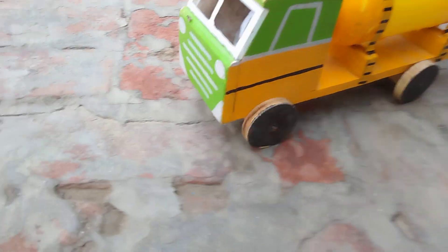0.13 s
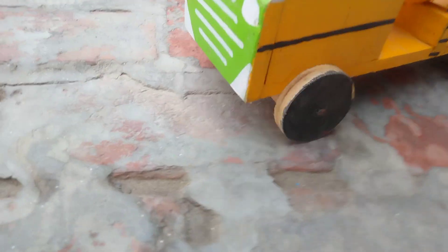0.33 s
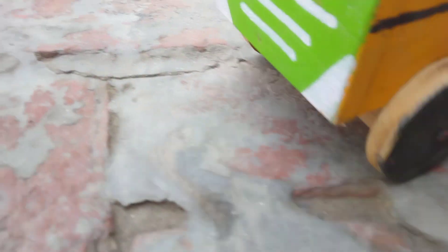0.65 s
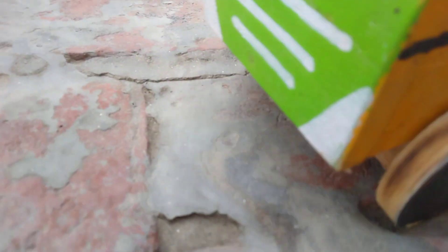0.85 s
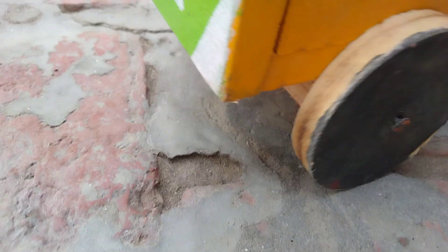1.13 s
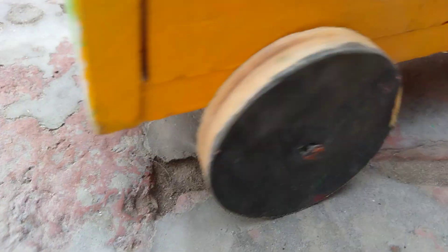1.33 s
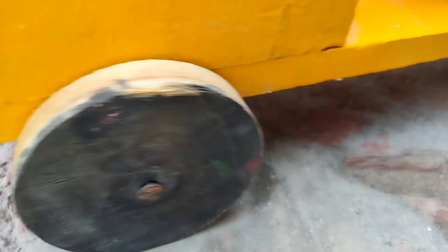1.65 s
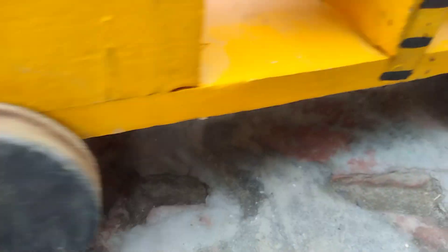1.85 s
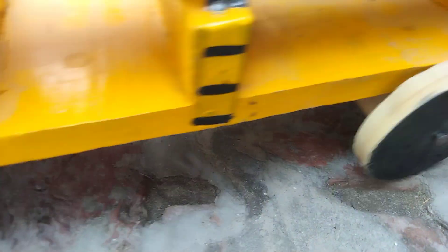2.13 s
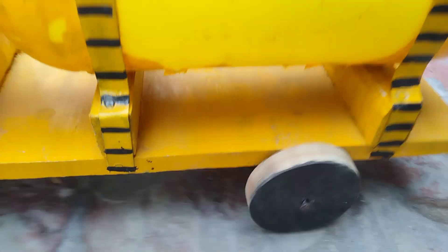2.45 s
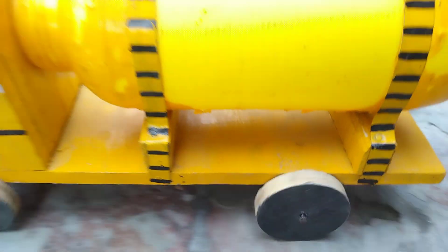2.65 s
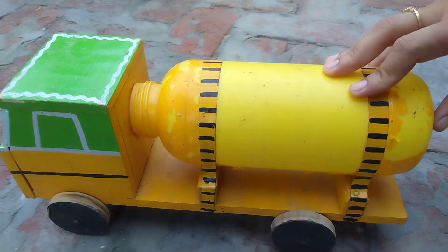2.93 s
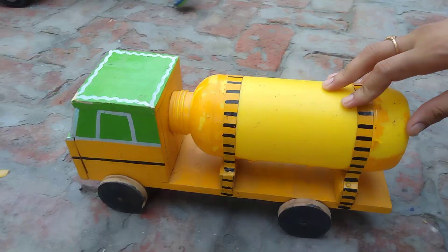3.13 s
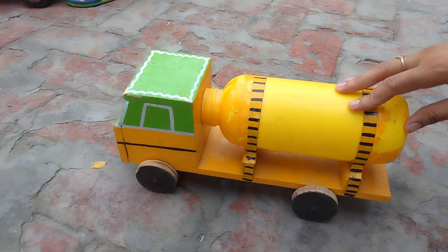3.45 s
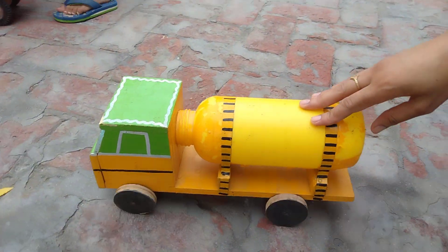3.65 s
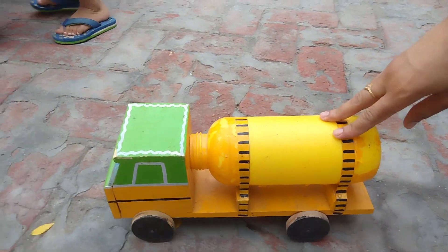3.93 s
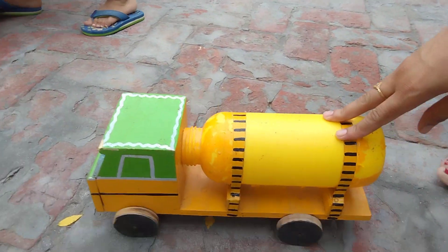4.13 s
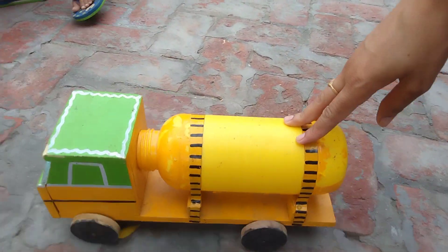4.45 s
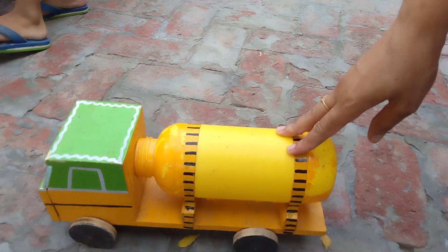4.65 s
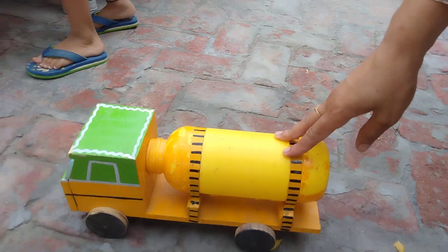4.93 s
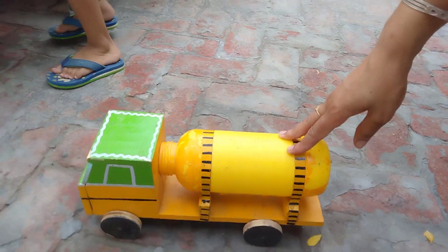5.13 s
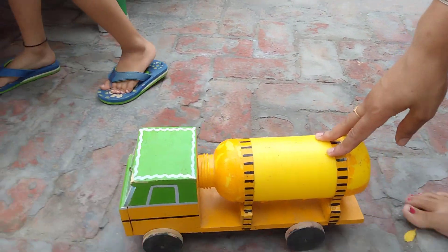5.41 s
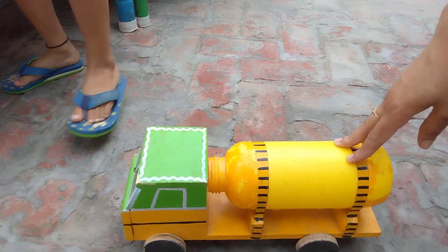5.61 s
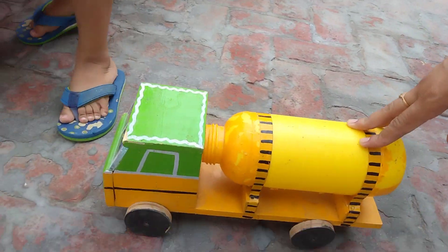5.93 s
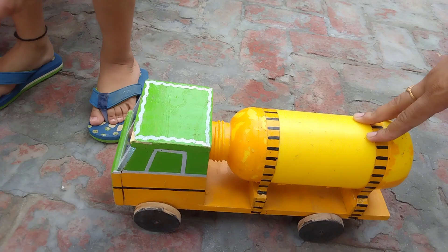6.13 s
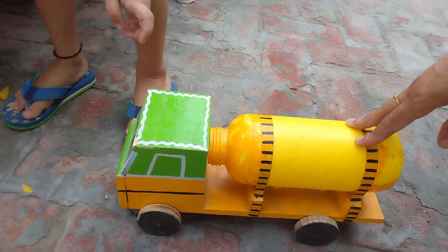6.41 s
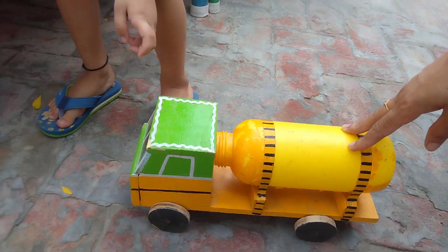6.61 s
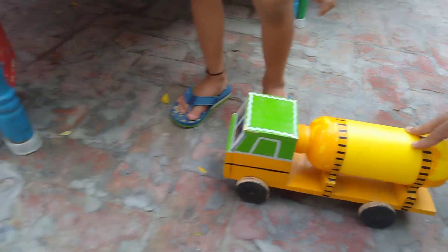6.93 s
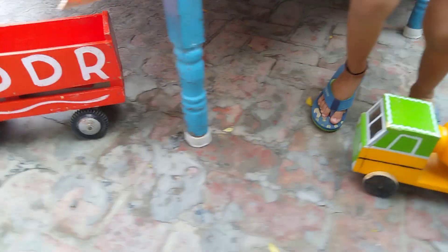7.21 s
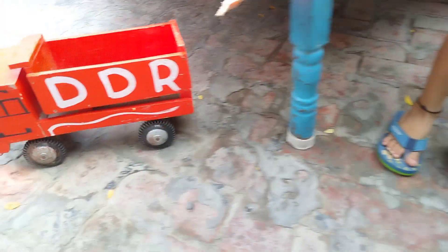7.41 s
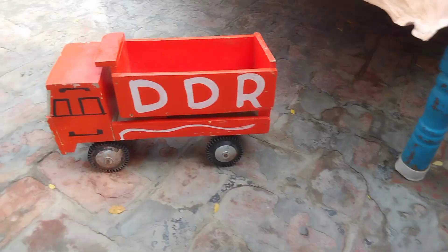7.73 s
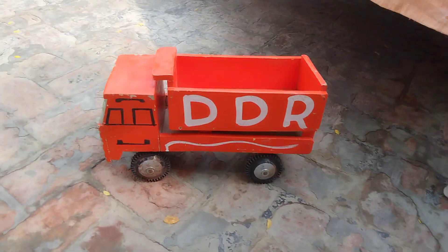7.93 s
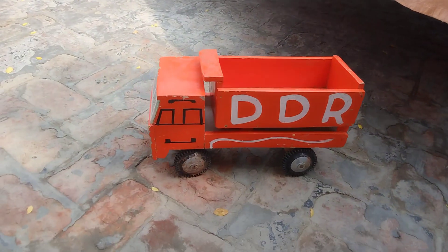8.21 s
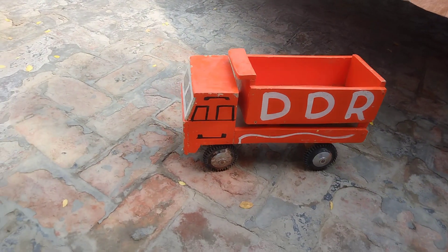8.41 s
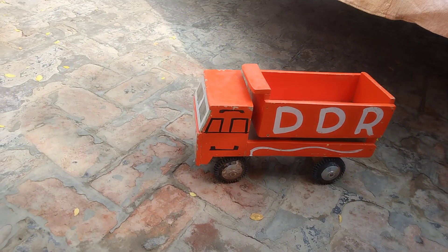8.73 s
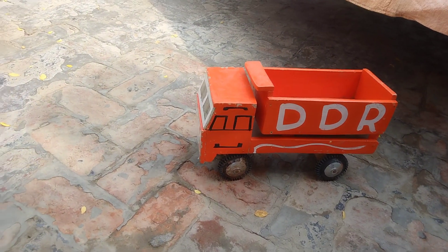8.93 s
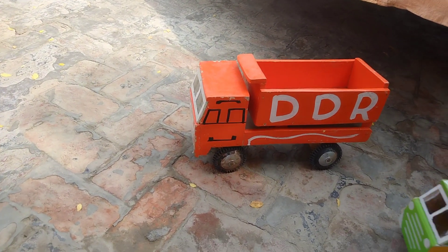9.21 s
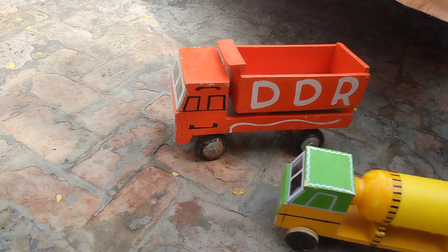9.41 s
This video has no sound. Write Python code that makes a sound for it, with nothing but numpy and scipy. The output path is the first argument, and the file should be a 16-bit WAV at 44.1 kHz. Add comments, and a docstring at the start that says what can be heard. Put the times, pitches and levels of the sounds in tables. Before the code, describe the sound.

A wooden toy truck rattles and clacks over rough stone with gritty scuffs, then a second toy truck rolls on, chattering loudly.

```python
"""A wooden toy truck sets off over a rough stone yard while a hand rumbles on the phone close by.
Pushed to and fro, its hollow body drums on the bumps, loose wheels clack and squeak on their axles,
grit grinds under the rims, and sandals and skidding rims scuff the stone. From about 2 s to 4 s the
wheels thud over joints. Near 8 s it comes to rest, and a second truck with harder wheels rolls on,
chattering loudly at the end. A faint far background lies under it all."""
import sys
import numpy as np
from scipy import signal
from scipy.fft import rfft, irfft, next_fast_len
from scipy.io import wavfile
from scipy.ndimage import map_coordinates

SR = 44100
rng = np.random.default_rng(int(sys.argv[2]) if len(sys.argv) > 2 else 0)


def waveform_to_disk(signal):
    """Save audio, clipped to [-1, 1], as 16-bit WAV at the path in sys.argv[1]."""
    frames = np.transpose(np.atleast_2d(signal))
    scaled = np.clip(frames, -1, 1) * 32767
    samples = np.round(scaled).astype(np.int16)
    wavfile.write(sys.argv[1], SR, samples)


N = 422033

# Levels are relative: each source adds its own gain. Rolling strength is the drive on a truck.
# rolling strength of the first truck, one list per push, and of the second: t/s, level/dB
FIRST_PUSHES = [
    [(0.0, -40), (0.142, -35), (0.288, -22), (0.322, -23), (0.384, -23), (0.576, -38), (0.644, -42),
     (0.85, -45.5)],
    [(0.9, -37), (0.928, -45), (1.028, -35.5), (1.2, -42), (1.312, -26), (1.47, -36.5)],
    [(1.52, -29.5), (1.596, -24), (1.718, -22), (1.898, -21.5), (2.45, -17)],
    [(2.5, -16), (3.128, -19), (3.308, -33), (3.45, -28.5)],
    [(3.55, -31.5), (3.722, -35.5), (3.882, -34), (4.168, -23), (4.45, -32)],
    [(4.55, -27), (4.718, -29.5), (4.914, -38.5), (5.398, -33.5), (5.704, -41), (5.836, -39.5), (5.9, -41)],
    [(6.0, -46), (6.126, -41.5), (6.328, -32.5), (6.504, -24), (6.652, -24), (6.85, -22.5)],
    [(6.92, -20), (7.046, -24.5), (7.3, -29.5), (7.492, -31), (7.7, -30.5)],
]
SECOND_PUSH = [(7.7, -34.5), (7.866, -27), (8.016, -39.5), (8.142, -43.5), (8.526, -48.5), (8.744, -42),
               (8.88, -27), (8.984, -25), (9.068, -26.5), (9.208, -26), (9.458, -27), (9.57, -24)]
# first truck passing and turning, over its strength: t/s, body level/dB, grit level/dB
PASSING_BALANCE = [(0, -6, -19), (.23, 0, -15.5), (.45, -2, -17.5), (.7, -10.5, -28), (1.05, 5, -13.5),
                   (1.3, -3.5, -18), (1.78, 2, -15), (2.08, -4.5, -16), (2.94, -9, -16.5), (3.95, -9, -15),
                   (4.16, -12.5, -16), (4.7, -13, -18), (5.4, -4, -12), (5.6, -14.5, -25),
                   (6.07, -6.5, -12.5), (6.73, -3, -14), (6.91, -10, -16), (7.7, -4, -13.5)]
# resonances of each truck's body and of its wheels and axles: f/Hz, bandwidth/Hz, level/dB
HOLLOW_BODY_MODES = [(380, 10, -26), (500, 51, -47), (539.4, 76.7, 8), (590, 120, -5), (770, 64, -18),
                     (806, 250, -7), (1067, 23, -5.5)]
LOOSE_WHEEL_MODES = [(861, 208, -2), (1145, 97, 5), (1349, 144, 0), (1527, 63, 3), (1621, 104, -1.5),
                     (1860, 165, -1), (2141, 210, -7.5), (2605, 700, -16), (3116, 340, -15)]
SECOND_BED_MODES = [(441, 43, -7), (642, 77, -7), (770, 90, -10.5)]
HARD_WHEEL_MODES = [(1030, 400, -14), (1250, 59, -2), (1420, 130, -4), (1800, 220, -12.5), (2010, 174, -5),
                    (2350, 590, -10.5), (2800, 230, -12.5), (3650, 720, -30.5)]
# loudest wheel impacts: t/s, level/dB, f/Hz of the struck part, crack level/dB over the impact
WHEEL_CLACKS = [(0.243, -4.5, 1300, -24), (0.2656, -3, 1470, -29), (0.377, -11, 1563, -15),
                (0.5196, -10, 1137, -29), (0.5352, -11, 1320, -36), (0.8643, -11.5, 1375, -45),
                (0.8975, -12.5, 1110, -41), (1.2272, -12.5, 1100, -11), (1.276, -9.5, 1810, -14.5),
                (1.3867, -16.5, 1240, -16.5), (1.5965, -8.5, 1060, -26), (1.8057, -9, 1110, -28),
                (1.9778, -5.5, 1100, -15), (1.9942, -5.5, 1270, -18), (2.0708, -6, 1060, -17),
                (2.2144, -7, 1100, -26), (2.269, 2, 1096, -19), (2.3386, -1, 1040, -19),
                (2.4487, -12, 1120, -31), (2.5226, -9, 1160, -18), (2.603, -13, 1130, -23),
                (2.7134, -3.5, 1280, -35), (2.774, -3, 1190, -21), (2.9028, -8, 1350, -26),
                (3.1131, -14.5, 1165, 0.5), (3.2235, -6.5, 1130, -16), (3.2948, -11, 1120, -20),
                (3.3513, -14, 1080, -16), (3.5291, -16, 1144, -18), (3.8848, -21, 1880, -8),
                (4.0679, -8.5, 1890, -22), (4.086, -13, 1195, -26), (4.3115, -17.5, 1150, -15),
                (4.393, -12, 1470, -29), (4.5226, -16, 1116, -33), (4.6151, -8.5, 1594, -23),
                (4.6884, -3, 1570, -27), (4.793, -14, 1550, -30), (4.8374, -12, 1926, -28),
                (5.0606, -19.5, 1220, -32), (5.0995, -15, 1620, -29), (5.2548, -18, 1110, -4.5),
                (5.464, -17.5, 1280, -20), (5.549, -13.5, 1500, -35), (5.5736, -16.5, 1170, -21),
                (5.591, -5.5, 1550, -22.5), (5.6134, -22, 1520, -16), (5.669, -9.5, 1140, -25),
                (5.733, -21, 1576, -32), (5.7602, -19.5, 1610, -22), (5.8145, -23, 1580, -28),
                (5.8709, -13.5, 1590, -24), (6.2958, -13, 1510, -23), (6.3263, -15, 1450, -18),
                (6.3705, -14.5, 1660, -12), (6.4255, -12, 1494, -14), (6.5071, -5.5, 1694, -17),
                (6.564, -10.5, 1450, -15), (6.6657, -9, 2010, -17), (6.7033, -6, 1095, -12),
                (6.7346, -6, 1900, -33), (6.8262, -8, 1930, -29), (7.003, -8.5, 1453, -12),
                (7.0529, -8.5, 1500, -28), (7.1616, -8.5, 1425, -14), (7.369, -20.5, 1190, -8),
                (7.6999, -16, 1370, -29), (7.7337, -10, 1390, -12), (7.7743, -13, 1390, -8),
                (7.812, -10.5, 1990, -10), (7.8394, -12, 1430, -12), (7.8743, -4, 1680, -4.5),
                (7.9457, -7, 1595, -10), (8.112, -25.5, 1470, -8), (8.2048, -26, 1680, -20),
                (8.3082, -23.5, 1520, -13), (8.4016, -20.5, 1635, -23), (8.428, -22, 1290, -24),
                (8.6996, -13, 1860, -17), (8.7188, -15.5, 1120, -21), (8.805, -17, 1110, -39),
                (8.8597, -10.5, 2050, -33), (8.887, -4.5, 1320, -12.5), (8.98, -4, 1420, -20),
                (9.0393, -5, 1440, -22), (9.075, -2, 1568, -23), (9.1082, -11.5, 1590, -17),
                (9.1271, -3.5, 1370, -26), (9.1656, -0.5, 1474, -24), (9.1917, -13, 1440, -23),
                (9.224, -18, 1460, -31), (9.2713, -5, 1420, -28), (9.3163, -0.5, 1445, -24),
                (9.3389, -4.5, 1480, -30), (9.3646, 1.5, 1520, -24), (9.411, -1, 1106, -15),
                (9.4218, -6, 1480, -11.5), (9.5025, 0, 1740, -22)]
# axle squeaks and ringing grit: t/s, level/dB, starting f/Hz, duration/s
AXLE_SQUEAKS = [(0.2, -33, 4400, 0.024), (0.392, -25, 4130, 0.025), (0.505, -36, 5000, 0.025),
                (2.733, -17.5, 3680, 0.021), (4.774, -26, 4860, 0.044), (5.285, -32, 7940, 0.036),
                (5.34, -24, 3600, 0.018), (5.983, -46, 8130, 0.027), (6.898, -31.5, 8230, 0.033),
                (7.812, -38, 11500, .04), (7.978, -44, 11600, .03), (8.665, -31, 4020, 0.04)]
# loudest pebbles snapping under a rim: t/s, level/dB, f/Hz
PEBBLE_SNAPS = [(0.176, -25, 8700), (1.6417, -31, 9660), (1.9995, -20, 9200), (2.1535, -26, 8550),
                (2.2654, -26, 8600), (2.337, -21.5, 8660), (2.664, -23, 8200), (2.7841, -24, 8250),
                (5.25, -28, 8200), (6.6967, -24.5, 8900), (6.763, -26, 9500), (7.0815, -27, 9860),
                (7.369, -28.5, 8370), (7.445, -24.5, 8710), (7.6261, -31, 8340), (7.7243, -22.5, 10100),
                (7.8074, -21, 11200), (7.873, -23.5, 9000), (7.9773, -35, 12600), (8.6971, -27, 9350),
                (8.8872, -27, 8900), (9.409, -26, 8000), (9.5033, -25, 8240)]
# swells from rough stone, scuffing, joints and the shifting hand: peak t/s, level/dB, rise/s, fall/s
ROUGH_PATCHES = [(.17, -23.5, 0.049, 0.069), (1.06, -40, 0.12, 0.041), (1.24, -23.5, 0.084, 0.1),
                 (1.6, -26, .05, 0.02), (2.12, -24, 0.15, 0.18), (2.79, -14.5, 0.014, 0.025),
                 (3.16, -15, 0.058, 0.16), (4.09, -19.5, 0.043, 0.054), (4.23, -27, 0.032, 0.081),
                 (4.82, -23, 0.1, 0.17), (5.13, -33, .05, .06), (5.28, -24, 0.097, 0.079),
                 (6.1, -33.5, 0.066, 0.037), (6.51, -25, 0.04, 0.046), (6.72, -18.5, 0.066, 0.13),
                 (7.08, -24.5, 0.067, 0.36)]
STONE_SCUFFS = [(.24, -41, 0.068, 0.17), (.7, -32, 0.083, 0.073), (1.08, -50, 0.14, 0.056),
                (1.68, -47, 0.037, .05), (1.89, -46, .04, .05), (2.39, -39, 0.092, 0.11),
                (2.66, -34.5, 0.053, 0.087), (3.04, -36, 0.043, 0.041), (3.15, -41, .08, 0.09),
                (3.36, -36, 0.035, .05), (3.74, -35.5, 0.1, 0.058), (3.97, -43, 0.033, 0.069),
                (4.11, -39, .08, .07), (4.37, -45, 0.042, .08), (4.8, -45, 0.092, 0.091),
                (5.27, -48, 0.018, 0.13), (5.68, -52, 0.027, .06), (6.06, -38.5, 0.1, 0.14),
                (6.15, -31.5, .07, 0.033), (6.23, -38.5, 0.14, 0.074), (6.97, -47, .08, 0.047),
                (7.81, -46.5, 0.02, 0.26), (8.29, -53, .04, 0.037), (8.38, -49, .03, 0.11),
                (8.49, -38, .04, 0.047), (8.53, -46, 0.037, .03), (8.64, -34.5, .06, 0.096),
                (9.02, -51, 0.094, 0.034)]
JOINT_THUDS = [(2.08, -36, 0.16, 0.15), (2.26, -37, 0.16, 0.092), (2.68, -37, .15, 0.34),
               (3.17, -36.5, .06, 0.13), (4.09, -43, 0.051, 0.088)]
HAND_THUMPS = [(.05, -22.5, .2, 0.052), (.27, -20.5, 0.093, 0.077), (.55, -43, 0.071, 0.088),
               (.9, -38, 0.086, .1), (1.1, -45, 0.13, 0.077)]
# ground rumble, set by how near the wheels are: t/s, level/dB
GROUND_LEVEL = [(0, -45.5), (1.5, -51.5), (2.3, -42.5), (3.2, -46.5), (4.2, -50.5), (5, -47.5), (5.9, -49),
                (6.6, -58.5), (7.8, -54), (8.8, -47.5), (9.57, -42)]
# noise spectra of grit, scuffs, ground, hand and far background: f/Hz, level/dB
GRIT_SPECTRUM = [(1500, -30), (2500, -5), (3200, 14), (4100, 15.5), (5200, -2.5), (8000, -20), (11000, -59),
                 (16000, -59)]
SCUFF_SPECTRUM = [(500, -18), (2500, -2.5), (4600, -0.5), (8000, -1.5), (11000, -5.5), (13000, 0),
                  (15000, 1), (16000, -5)]
GROUND_SPECTRUM = [(15, -70), (25, -34), (70, -17.5), (157, -3), (174, -1), (264, -8), (320, -3.5),
                   (420, -4.5), (700, -120)]
HAND_SPECTRUM = [(15, -53), (30, -26), (60, -8), (110, -7.5), (165, 2.5), (270, -14), (420, -28),
                 (700, -120)]
YARD_SPECTRUM = [(24, -54), (40, -44.5), (224, -14), (472, 16), (548, -37), (653, 18), (1600, 2),
                 (6320, -15), (8310, -36), (9410, -30), (15500, -11)]
# reverberation time of the yard: f/Hz, T60/s
YARD_T60 = [(200, 0.41), (2000, 0.37), (10000, 0.024)]
# frequency response of the phone's sound port: f/Hz, level/dB
PORT_RESPONSE = [(30, -1), (60, -8), (100, -1), (4500, -2.5), (5600, -7), (6600, -10), (7300, -4.5),
                 (7900, -2), (8800, -6), (10500, -8), (12500, -12.5), (15000, -9.5)]


def rolling():
    """Forced vibration: the same jolts drive body and wheel resonances and crush the grit."""
    first_db, second_db = strengths()
    body_db, grit_db = curves(PASSING_BALANCE)
    jolt = jolts(rate=90, spread_db=4.5, decay_s=0.0051, floor=1.0)
    stone = bumps(rate=700, spread_db=3.0, clump_db=1.5, rubbing=0.9) * (1.35 + jolt)
    shake = bumps(rate=900, spread_db=2.0, clump_db=2.0, rubbing=0.52) * jolt
    body = amp(first_db + body_db + 3.5) * ringing(stone, HOLLOW_BODY_MODES)
    load_bed = amp(second_db - 9) * ringing(stone, SECOND_BED_MODES)
    loose_wheels = amp(first_db - 3.5) * ringing(shake, LOOSE_WHEEL_MODES)
    hard_wheels = amp(second_db + 1.5) * ringing(shake, HARD_WHEEL_MODES)
    return body + load_bed + loose_wheels + hard_wheels + grit(jolt, grit_db)


def strengths(patch_db=0):
    """Roughness excitation: each truck's drive in dB; rough patches add to the first one's."""
    stop_s, start_s, rest_db = 7.92, 7.6, -75
    pushing_db = curves(sorted(sum(FIRST_PUSHES, [])) + [(stop_s, rest_db)])[0]
    first_db = 20 * np.log10(amp(pushing_db) + amp(patch_db) * swells(ROUGH_PATCHES, fade_db=21))
    second_db = curves([(start_s, rest_db)] + SECOND_PUSH)[0]
    return first_db, second_db


def jolts(rate, spread_db, decay_s, floor):
    """Shot noise: an envelope of random kicks, rate a second, decaying over a steady floor."""
    when, size = rng.random(N), rng.exponential(size=N)
    kicks = (when < rate / SR) * amp(np.minimum(spread_db * size, 14))
    return floor + unit(signal.lfilter([1], [1, -np.exp(-1 / (decay_s * SR))], kicks))


def bumps(rate, spread_db, clump_db, rubbing):
    """Contact force: random impulses, rate a second, plus friction noise, swelling in clumps."""
    when, size, friction = rng.random(N), rng.exponential(size=N), rng.standard_normal(N)
    knocks = (when < rate / SR) * amp(np.minimum(spread_db * size, 24)) * np.sign(friction)
    return amp(clump_db * wobble(35)) * (unit(knocks) + rubbing * friction)


def clacks():
    """Impact excitation: a blow rings most the wheel modes near the struck part's frequency."""
    out, t = np.zeros(N + SR), np.arange(SR // 12) / SR
    hz, _, level_db = np.transpose(LOOSE_WHEEL_MODES)
    lesser = [*scattered(count=24, from_s=0, over_db=14.5, lo_hz=1010, hi_hz=1937),
              *scattered(count=16, from_s=8.85, over_db=18, lo_hz=1380, hi_hz=1600)]  # hard wheels
    for s, db, centre_hz, crack_db in WHEEL_CLACKS + [(*row, -25.5) for row in lesser]:
        focus_db = -24 * np.abs(np.log(hz / centre_hz))
        tuned = hz * (1 + 0.043 * rng.standard_normal(len(hz)))  # no two wheels are cut alike
        tuned[np.argmax(focus_db)] = centre_hz
        ring = struck_modes(tuned, 0.3 * level_db + focus_db, 0.036 * (1500 / tuned) ** .5, t)
        bounce_delay = round(rng.uniform(0.00194, 0.0097) * SR)
        bounce = rng.uniform(0.019, 0.17) * np.pad(ring, (bounce_delay, 0))[:len(t)]
        knock = 0.23 * burst(450, 2630, 0.056, t)
        crack = amp(crack_db + 5.5) * burst(1480, 4630, 0.024, t)
        snap = amp(crack_db - 12.5) * burst(6100, 10400, 0.016, t)
        out[round((s - .0012) * SR):][:len(t)] += amp(db - 0.5) * (ring + bounce + knock + crack + snap)
    return out[:N]


def struck_modes(hz, level_db, t60, t):
    """Modal superposition: damped sinusoids of random strength and phase, peak 1."""
    size = amp(level_db + 4.45 * rng.standard_normal(len(hz)))
    phase = 2 * np.pi * (hz[:, None] * t + rng.random((len(hz), 1)))
    ring = size @ (amp(-60 * t / t60[:, None]) * np.sin(phase))
    ring *= (1 - np.exp(-t / 0.0013)) ** 2  # wood on wood: contact takes about a millisecond
    return ring / np.abs(ring).max()


def grit(jolt, grit_db):
    """Brittle fracture: grit crushed under the rims gives noise and ticks, more on rough patches."""
    crunch = .6 * jolt + jolts(rate=110, spread_db=4, decay_s=.003, floor=.3)
    sand = coloured(crunch * rng.standard_normal(N), GRIT_SPECTRUM)
    ticks = grains(rate=500, centre_hz=4200, scatter=.17, cycles=12, spread_db=3.5)
    fine = grains(rate=900, centre_hz=8000, scatter=.1, cycles=9, spread_db=3.5)
    crackle = grains(rate=120, centre_hz=4535, scatter=0.097, cycles=5.3, spread_db=2.5)
    first_db, second_db = strengths(patch_db=2)
    pressed = amp(first_db + grit_db + 5.5) + amp(second_db - 25)
    return pressed * amp(1.5 * wobble(30)) * (0.33 * sand + 0.35 * ticks + 0.12 * fine + 0.38 * crackle)


def grains(rate, centre_hz, scatter, cycles, spread_db):
    """Damped oscillation: each crushed grain rings briefly at its own frequency; the sum has rms 1."""
    when, chance, stretch = np.hsplit(rng.random((round(rate * N / SR), 4)), 4)[:3]
    t = np.arange(300) / SR
    hz = np.clip(centre_hz * np.exp(scatter * rng.standard_normal(len(when))), 500, 15000)[:, None]
    size = amp(np.minimum(-spread_db * np.log(chance), 20))
    age = t * hz / (cycles * (0.9 + stretch))
    tone = size * age * np.exp(-3 * age) * np.sin(2 * np.pi * hz * t)
    index = (when * N).astype(int) + np.arange(len(t))
    return unit(np.bincount(index.ravel(), tone.ravel(), minlength=N)[:N])


def squeaks():
    """Friction-induced vibration: a dry axle or trapped stone sings roughly, its pitch sagging."""
    out = np.zeros(N + SR)
    for s, db, hz, length in AXLE_SQUEAKS:
        t = np.arange(round(length * SR)) / SR
        jitter = .2 * np.cumsum(rng.standard_normal(len(t)))
        phase = 2 * np.pi * hz * t * (1 - .7 * t) + jitter
        out[round(s * SR):][:len(t)] += amp(db) * np.hanning(len(t)) * np.sin(phase)
    return out[:N]


def pebbles():
    """Short impacts have wide spectra: a pebble snaps with a dry tick and a trace of its own pitch."""
    out, t = np.zeros(N + SR), np.arange(SR // 20) / SR
    lesser = scattered(count=30, from_s=0, over_db=-6, lo_hz=8500, hi_hz=10500)
    for s, db, hz in PEBBLE_SNAPS + list(lesser):
        tick = 0.6 * burst(8800, 14400, 0.0068, t) + 0.47 * burst(0.92 * hz, 1.035 * hz, 0.023, t)
        out[round(s * SR):][:len(t)] += amp(db + 4.0) * tick
    return out[:N]


def scuffs():
    """Sliding friction: soles and rims on dusty stone make a fine hiss with sand ticking in it."""
    rolling_db = np.maximum(*strengths())
    sandy = unit(jolts(rate=34, spread_db=7.5, decay_s=0.0063, floor=0.6))
    drags = swells(STONE_SCUFFS, fade_db=21.5, roundness=1.3) * (0.67 + 0.32 * sandy)
    rim_dust = amp(-54 + .15 * (rolling_db + 29)) * sandy
    friction = bumps(rate=3000, spread_db=2, clump_db=1, rubbing=1.5)
    return (drags + rim_dust) * coloured(friction, SCUFF_SPECTRUM)


def rumble():
    """Structure-borne sound: ground and hand carry low shaking; a faint far hum lies beneath."""
    wheels = amp(curves(GROUND_LEVEL)[0] + 0.37 * (np.maximum(*strengths()) + 31))
    ground_gain = wheels + swells(JOINT_THUDS, fade_db=26) + amp(-59)  # floor: the surroundings
    hand = swells(HAND_THUMPS, fade_db=17) * coloured(rng.standard_normal(N), HAND_SPECTRUM)
    hum = far_hum()
    flutter = amp(2.4 * wobble(12))
    ground = ground_gain * coloured(rng.standard_normal(N), GROUND_SPECTRUM)
    return flutter * (ground + hand) + hum


def reverberation(x):
    """Diffuse reflection: the walls return a tail in which each frequency decays at its own rate."""
    hz, t, spectra = signal.stft(rng.standard_normal(SR // 2), SR, nperseg=256)
    tail = signal.istft(spectra * amp(-60 * t / along(YARD_T60, hz)[:, None]), SR, nperseg=256)[1]
    return signal.fftconvolve(np.pad(x, (300, 0)), tail / np.linalg.norm(tail))[:N]


def far_hum(hz=98, width_hz=29):
    """Narrow-band noise is heard as a hum of indistinct pitch."""
    band = [(hz, width_hz, 0)]
    return amp(-64.5) * ringing(ringing(rng.standard_normal(N), band), band)


def far_background():
    """Ambient noise: distant sound merges into a wash whose level wavers slightly."""
    return amp(-51 + 0.75 * wobble(9)) * coloured(rng.standard_normal(N), YARD_SPECTRUM)


def scattered(count, from_s, over_db, lo_hz, hi_hz):
    """Random impacts whose level follows the rolling strength: t/s, level/dB, f/Hz."""
    when, size, pitch = rng.random((count, 3)).T
    s = from_s + when * (N / SR - from_s)
    level_db = np.maximum(*strengths())[(s * SR).astype(int)] + over_db - 10 * size
    return np.transpose([s, level_db, lo_hz * (hi_hz / lo_hz) ** pitch])


def burst(lo_hz, hi_hz, t60, t):
    """Exponential decay of band-limited noise, peak 1."""
    band = signal.butter(3, [lo_hz, hi_hz], "band", fs=SR)
    envelope = amp(-60 * t / t60) * (1 - np.exp(-t / 0.00065))
    puff = signal.lfilter(*band, rng.standard_normal(len(t)) * envelope)
    return puff / np.abs(puff).max()


def swells(rows, fade_db, roundness=1):
    """Summed envelopes, each fade_db down one rise before its peak and one fall after it."""
    t = np.arange(0, N / SR, .002)
    gain = sum(amp(db - fade_db * np.maximum((s - t) / rise, (t - s) / fall) ** roundness)
               for s, db, rise, fall in rows)
    return np.interp(np.arange(N) / SR, t, gain)


def ringing(x, modes):
    """Resonance: x drives parallel second-order modes of alternating sign, rms 1."""
    return unit(filtered(x, lambda f: sum(
        (-1) ** k * amp(db) * 1j * f * width / (f0 * f0 - f * f + 1j * f * width)
        for k, (f0, width, db) in enumerate(modes))))


def coloured(x, spectrum):
    """Spectral shaping of x by points (f/Hz, level/dB), rms 1."""
    return unit(filtered(x, lambda hz: amp(along(spectrum, hz))))


def filtered(x, response):
    """Linear filtering: the spectrum of x times a frequency response."""
    size = next_fast_len(N + SR // 2)
    return irfft(rfft(x, size) * response(np.fft.rfftfreq(size, 1 / SR)), size)[:N]


def wobble(rate):
    """Smooth random modulation, rate knots a second."""
    return map_coordinates(rng.standard_normal(int(N * rate / SR) + 4), [np.arange(N) * rate / SR])


def curves(rows):
    """Linear interpolation in time of each column after t/s."""
    s, *columns = np.transpose(rows)
    return [np.interp(np.arange(N) / SR, s, column) for column in columns]


def along(points, hz):
    """Interpolation of points (f/Hz, value) on a logarithmic frequency axis."""
    f, values = np.transpose(points)
    return np.interp(np.log(hz + 1), np.log(f + 1), values)


def amp(db):
    return 10 ** (np.asarray(db) / 20)


def unit(x):
    return x / np.sqrt(np.mean(x ** 2) + 1e-20)


def scene():
    """Superposition: the trucks, their reflections, scuffs, rumble and background add in one channel."""
    trucks = rolling() + clacks() + squeaks() + pebbles()
    background = far_background()
    return (trucks + amp(-15) * reverberation(trucks) + scuffs() + rumble() + background)[None]


def record(dry):
    """Transduction: the phone's port colours the sound, peaks saturate and the band is limited."""
    x = filtered(dry[0], lambda hz: amp(along(PORT_RESPONSE, hz)))
    x = x / (1 + np.abs(x) ** 8) ** (1 / 8)
    return filtered(x, lambda hz: hz < 15750)[None]


dry = scene()
out = record(dry)
waveform_to_disk(out)
```